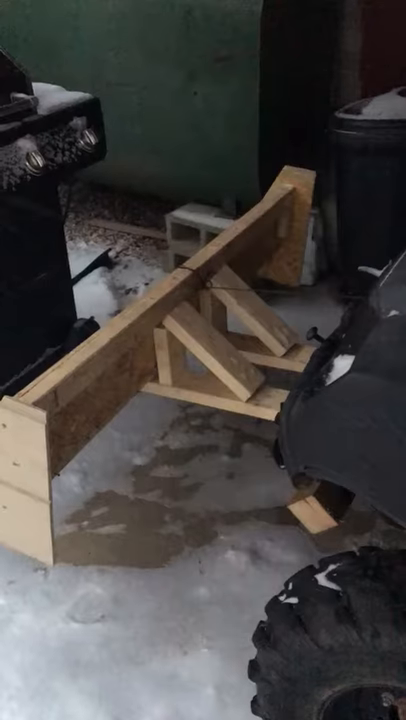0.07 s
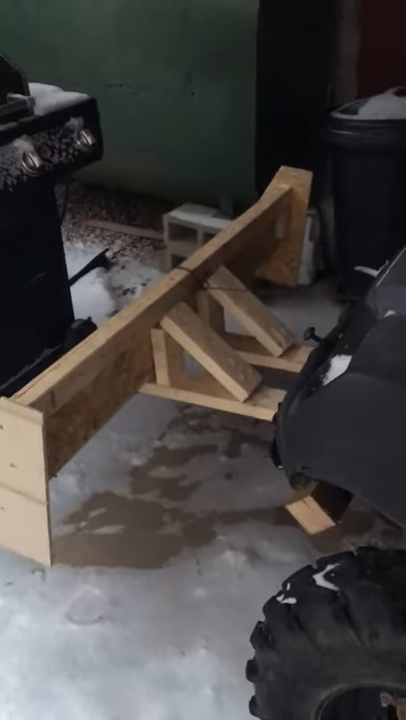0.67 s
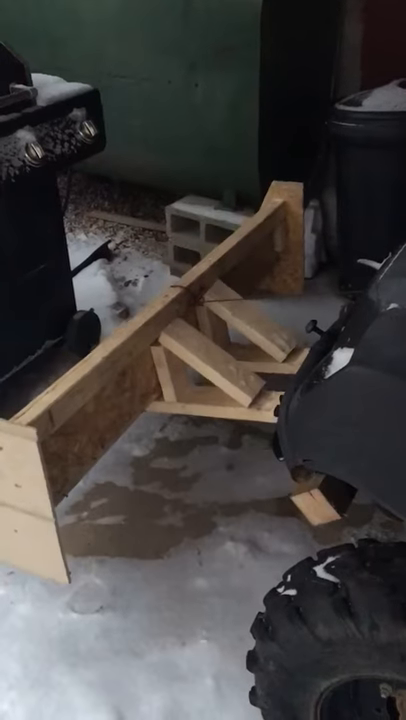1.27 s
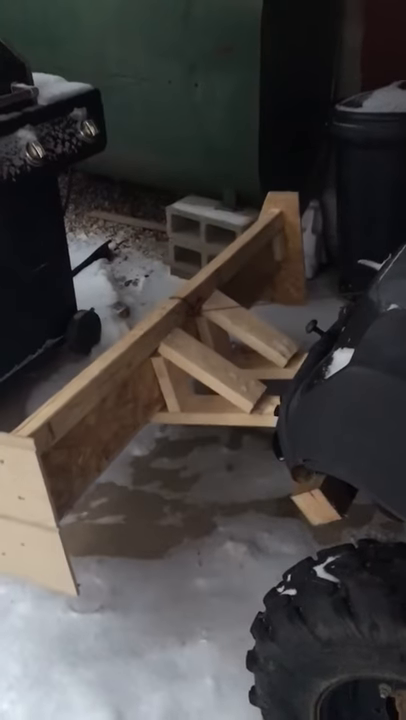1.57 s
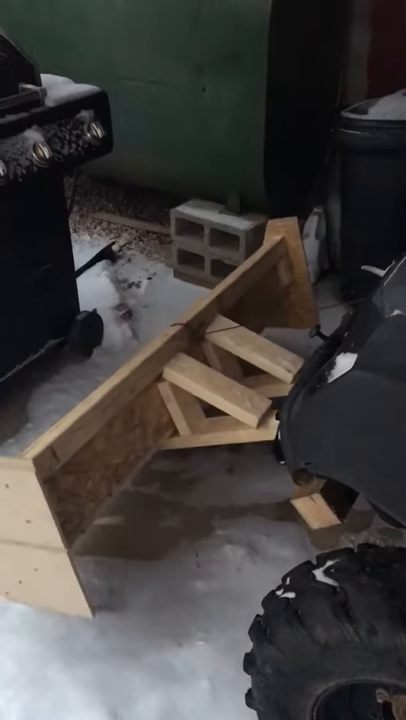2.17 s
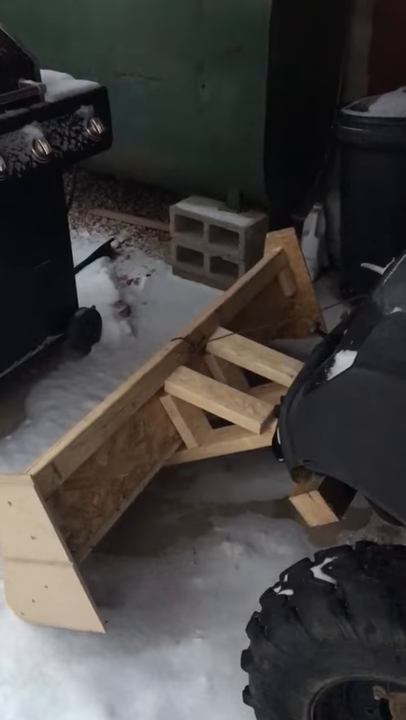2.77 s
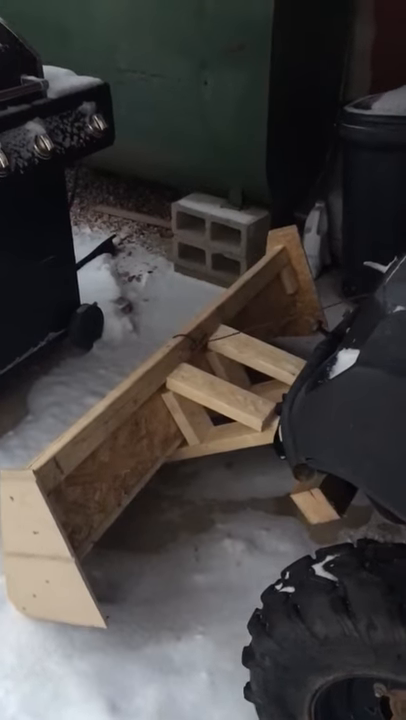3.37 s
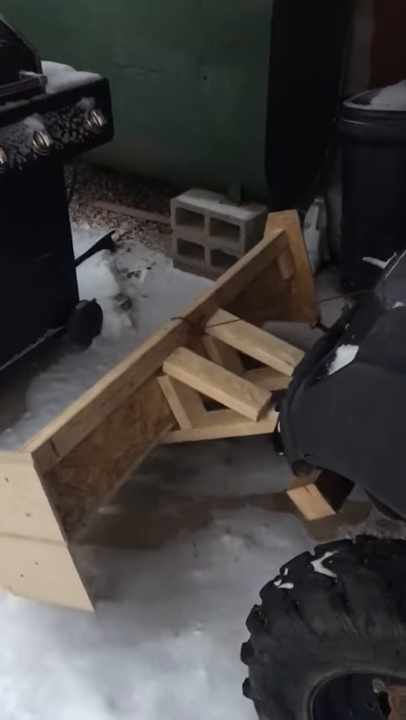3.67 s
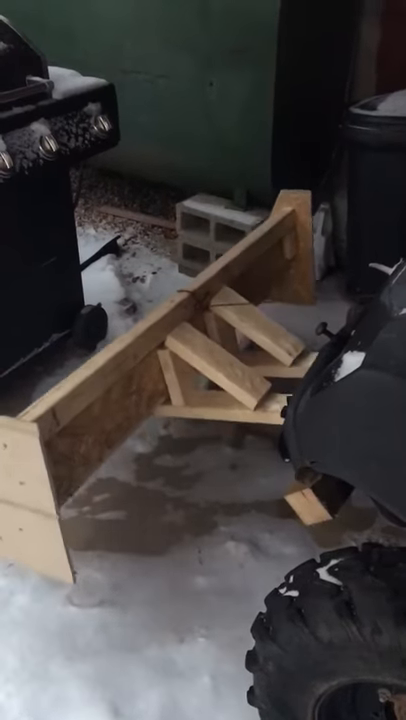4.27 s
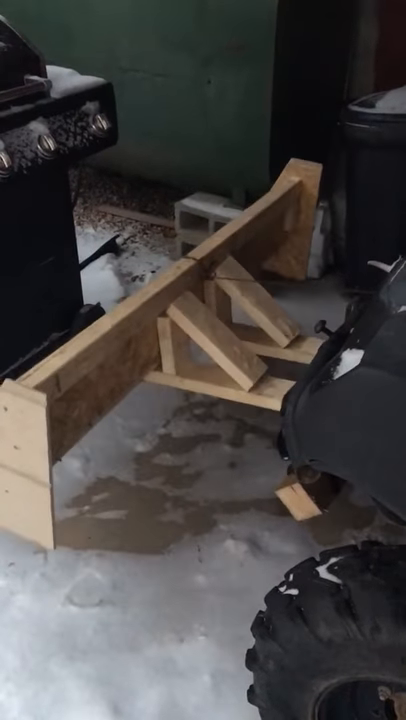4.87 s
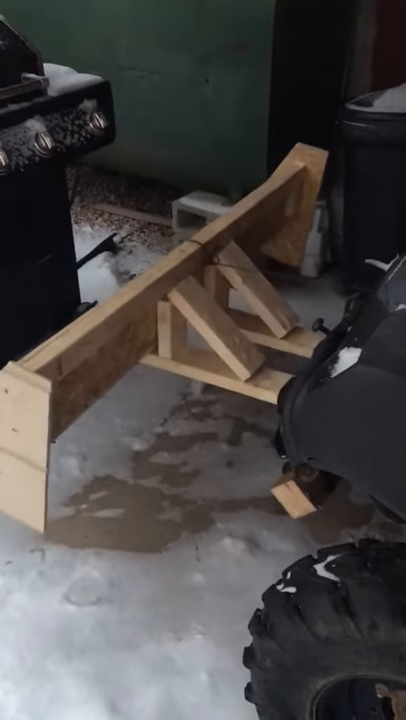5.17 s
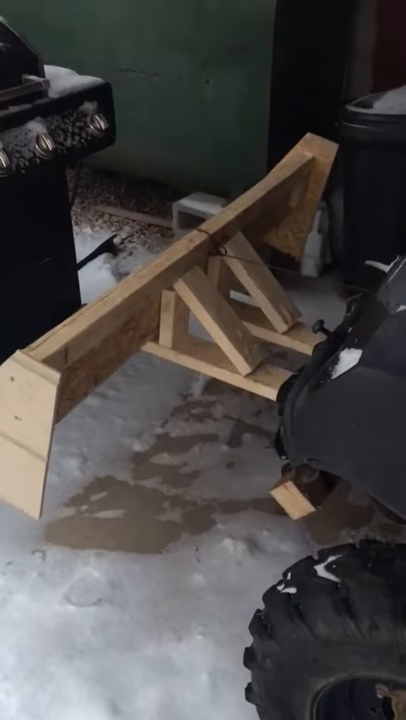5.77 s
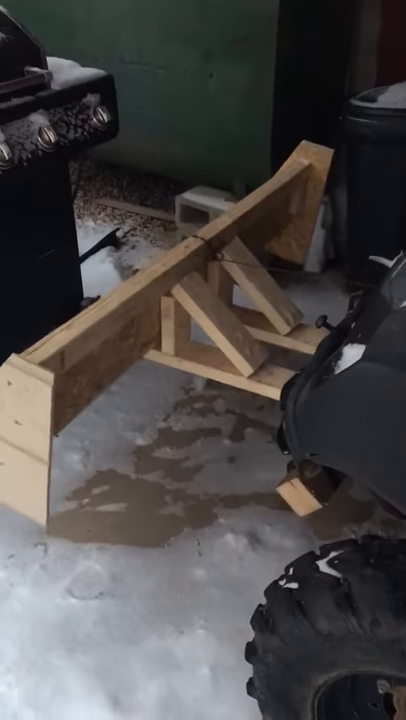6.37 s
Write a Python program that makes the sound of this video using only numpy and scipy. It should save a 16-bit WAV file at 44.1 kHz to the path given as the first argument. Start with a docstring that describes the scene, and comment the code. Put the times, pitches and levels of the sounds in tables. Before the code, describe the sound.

Light wind brushes the microphone outdoors, with a very faint, distant gliding whistle in the first half second. At 0.7 seconds a relay ticks, the drive clacks and an electric winch starts a loud, steady, grinding whine. The wooden plow blade knocks dully twice around 0.9, and the cable scuffs at 1.3. The motor stops at 2.9 with a clack and a faint steel ring. At 3.3 another tick and clack start the lift, louder and higher, racing briefly before settling. The cable scuffs near 5.1, then the pitch sags under load, and the winch stops at 5.5 with a clack, a wooden knock and a lingering ring from the steel frame. At 6.1 a click and clack start one short, lower run, lasting until about 6.4, as a wind gust rumbles on the microphone. Surrounding walls add a faint echo.

```python
"""Light wind on the microphone and a faint far whistle, then a relay tick, a clack and a whining winch.
The electric winch, on a quad, lowers a wooden plow blade, lifts it and briefly lowers it again.
Meshing teeth give tones at multiples of the shaft rate; their friction drives the housing's resonances.
The cable scuffs, the blade knocks and bobs, and the steel frame rings after the first two stops.
Surrounding walls return a faint echo."""
import sys
import numpy as np
from scipy import signal
from scipy.fft import rfft, irfft, next_fast_len
from scipy.io import wavfile
from scipy.ndimage import map_coordinates

SR = 44100
rng = np.random.default_rng(int(sys.argv[2]) if len(sys.argv) > 2 else 0)


def generate_wav(sig):
    """Save sig (samples, or channels by samples) to the path in sys.argv[1] as 16-bit PCM at SR."""
    pcm = np.round(np.clip(np.atleast_2d(sig).T, -1, 1) * 32767).astype(np.int16)
    wavfile.write(sys.argv[1], SR, pcm)


N = 283563
T = np.arange(N) / SR

# winch runs: start/s, stop/s, lifting, run-up/s, grinding/dB, whine/dB, hum/dB, brush hiss/dB
WINCH_RUNS = [(0.759, 2.895, False, 0.15, -28, -28, -29, -43.5),
              (3.309, 5.559, True, 0.27, -25, -23, -21.2, -39),
              (6.09, 6.43, False, 0.12, -27.5, -28.5, -34.5, -44.5)]
# tooth rate, one curve a run; the lift races until the cable is taut and labours near the top: t/s, f/Hz
MESH_RATES = [
    [(0.78, 271.6), (0.95, 311.1), (1.4, 311), (1.9, 305.4), (2.9, 303.7)],
    [(3.33, 294.5), (3.46, 402.3), (3.54, 403.5), (3.66, 362.5), (3.87, 350.6), (4.3, 345.8), (4.53, 352.4),
     (5.05, 350.7), (5.35, 344.9), (5.66, 308.5)],
    [(6.11, 266.6), (6.2, 288.8), (6.43, 308.8)],
]
# blade position: t/s, height (0 on the ground, 1 fully raised)
BLADE_HEIGHT = [(0.78, 0.7), (2.73, 0), (3.44, 0.0056), (5.55, 0.68), (6.11, 0.8), (6.43, 0.75)]
# gear tones: multiples of the shaft rate
SHAFT_ORDERS = [13, 14, 15, 16, 17, 18, 20, 30, 31, 32, 33, 34, 48, 57, 63, 64, 65, 79, 80, 82, 96, 111,
                112, 127, 128, 144, 160]
# strength of each gear tone, lowering and lifting: level/dB
ORDER_LEVELS_DOWN = [-21, -9.5, -7, -0.5, -12, -23, -16.5, -18, -35, -10.5, -12, -12.5, -11.5, -38, -23,
                     -12.5, -7, -17, -15.5, -11.5, -15, -19.5, -20.5, -15, -18, -22, -20]
ORDER_LEVELS_UP = [-22.5, -9, -10.5, -16.5, -12, -21, -48, -11, -14.5, -8, -18, -53, -13, -14.5, -13, -12.5,
                   -18, -15, -12, -20.5, -17.5, -18.5, -18.5, -19, -21, -19.5, -34]
# change from ground to top as the tooth load shifts: mesh harmonic, gain lowering/dB, gain lifting/dB
LOAD_GAINS = [(1, 11, -7.5), (2, -3, -8.5), (3, -10.5, -5), (4, 1.5, -2), (5, 16, 16), (6, 2, 10),
              (7, 2, -3), (9, 21, 9)]
# gear housing resonances: f/Hz, width/Hz, gain/dB
HOUSING_MODES = [(670, 65, 3.5), (1290, 55, 5), (1401, 35, 2.5), (1590, 60, 2), (1738, 35, 3.8),
                 (2420, 45, 5.5), (2810, 45, 4.5), (3135, 55, 5.5), (4225, 55, 5.5), (6440, 150, 4.5)]
# the housing rings as the motor spins up for the lift: t/s, length/s, first f/Hz, last f/Hz, level/dB
SPIN_UP_RING = (3.362, 0.09, 650, 745, -28.5)
# the drive takes up or drops its load: t/s, level/dB, rattle/s, T60/s, tilt/(dB per octave)
DRIVE_CLACKS = [(0.7445, -19, 0.0085, 0.11, -2), (2.9006, -19, 0.0082, 0.15, -4),
                (3.28, -21, 0.013, 0.11, -2), (5.543, -27, 0.0063, 0.095, 2.5),
                (6.081, -22, 0.01, 0.096, -0.5)]
# relay and switch contacts: t/s, level/dB, T60/s, ring f/Hz, ring gain/dB
RELAY_TICKS = [(0.7132, -35, 0.011, 2200, 15), (3.201, -42, 0.01, 2480, 14), (3.2533, -24, 0.016, 2730, 26),
               (6.053, -48, 0.03, 3520, -2), (6.0617, -28, 0.011, 2190, 13)]
# the cable slips and the blade bobs on it: t/s, level/dB, rise/s, T60/s, tilt/(dB per octave)
CABLE_SCUFFS = [(0.718, -40.5, 0.014, 0.22, 0.5), (1.281, -39, .003, 0.11, 14),
                (1.308, -33.5, 0.0034, 0.17, 13), (2.631, -50, 0.0091, 0.38, 13),
                (3.161, -51, 0.0033, 0.17, -1.5), (3.261, -42, 0.0049, 0.87, 0), (4.03, -40, .01, 0.31, 9),
                (5.07, -31, 0.0045, 0.18, 4), (5.702, -44, 0.002, 0.16, 4), (5.769, -45, 0.013, 0.19, 3.5),
                (5.866, -45, 0.02, 0.19, 3), (5.937, -48.5, 0.011, 0.19, 0.5),
                (6.064, -39.5, .003, 0.22, -0.5)]
# knocks of the wooden blade: t/s, level/dB, T60/s
BLADE_KNOCKS = [(0.880, -21, 0.12), (0.91, -22, 0.12), (2.92, -36.5, 0.28), (3.159, -56, 0.089),
                (5.549, -25, 0.15), (6.086, -27, 0.056)]
# steel frame modes: f/Hz, T60/s, level after lowering/dB, level after lifting/dB
FRAME_MODES = [(302, 0.42, -55, -39), (316, 2.5, -58, -42.5), (346, 2.2, -59, -42.5), (1030, 1.3, -56, -52),
               (1430, 0.97, -51, -61), (1740, 1.8, -73, -65)]
# stops that excite the frame: t/s
FRAME_JOLTS = [2.905, 5.55]
# gusts: peak t/s, level/dB, length/s
WIND_GUSTS = [(0.217, -50.5, 0.12), (0.437, -44, 0.1), (0.773, -43, 0.037), (0.96, -51, 0.12),
              (2.865, -46, 0.19), (4.109, -46, 0.072), (4.329, -51, 0.17), (4.604, -40, 0.04),
              (4.76, -36, 0.05), (5.355, -40, 0.09), (5.63, -46, 0.072), (5.96, -43, 0.061),
              (6.15, -35, 0.06), (6.3, -28.5, 0.24)]
# distant whistle: t/s, f/Hz, level/dB
WHISTLE_CONTOUR = [(0.19, 3000, -88.5), (0.23, 2930, -72.5), (0.28, 2340, -78), (0.33, 2170, -72),
                   (0.40, 1950, -79.5), (0.46, 2150, -76), (0.53, 2220, -75), (0.57, 2200, -88)]
# spectral densities of the noises: f/Hz, relative level/dB
GRIND_DOWN_SPECTRUM = [(100, -24), (200, -8), (300, 6.5), (400, 0), (490, -6), (660, 0), (770, -5.5),
                       (880, -0.5), (1350, -3), (1900, -5), (2700, -10.5), (3300, -6), (4300, -12),
                       (5200, -28.5)]
GRIND_UP_SPECTRUM = [(100, -24), (200, -13.5), (300, -1.5), (400, -2), (510, -7.5), (670, 0.5), (780, -5),
                     (880, -1), (1350, -2.5), (1900, -4.5), (2700, -8), (3300, -7), (4300, -10.5),
                     (5200, -30.5)]
BRUSH_SPECTRUM = [(2500, -20), (4500, -4.5), (5200, 3), (6500, 1.5), (8500, -2), (9700, -5.5), (10400, -12),
                  (11300, -9), (13500, -16), (16000, -23.5)]
CLACK_SPECTRUM = [(70, -53), (160, -20.5), (250, 1), (480, -16), (800, -8), (1200, -2), (2300, -4),
                  (3400, -5.5), (5200, -4), (6600, -4.5), (8500, -9), (10400, -16), (12000, -18.5),
                  (16000, -25)]
SCUFF_SPECTRUM = [(200, 13.5), (900, 2), (2000, -3.5), (4000, -9), (7000, -12), (10000, -24), (16000, -36)]
KNOCK_SPECTRUM = [(80, -39.5), (150, 5), (210, 6.5), (290, 16.5), (450, 4), (900, -16)]
ECHO_SPECTRUM = [(100, 25.5), (1000, -2.5), (3500, -7.5), (7000, -6), (16000, -17)]
WIND_SPECTRUM = [(20, -39), (35, -5.5), (58, 1.5), (100, -3), (170, -7), (300, -17), (600, -50),
                 (1500, -49.5), (5000, -72)]
AIR_SPECTRUM = [(180, -22.5), (300, 2), (416, -4.5), (568, -7), (814, -12.5), (913, -12.5), (1370, -16.5),
                (15000, -37)]

TEETH = 16  # meshes per shaft turn
RIPPLE_DB = 2.1  # spectral ripple of many small modes


def winch(mesh_rate, start, stop, lifting, run_up, grind_db, whine_db, hum_db, hiss_db):
    """Periodic tooth contact gives tones and modulates the friction noise of gears and motor brushes."""
    t = np.arange(start, stop + .25, 1 / SR)
    height = np.interp(t, *np.transpose(BLADE_HEIGHT))
    slack = np.clip(1 - height / 0.019, 0, 1)  # a grounded blade lets the gears run light
    unseated = np.exp((start - t) / run_up)  # the tones emerge as the teeth seat
    tooth_hz = np.interp(t, *np.transpose(mesh_rate)) * (1 + .0025 * drift(t, 25))
    meshes = np.cumsum(tooth_hz) / SR
    turns = meshes / TEETH
    throb = evened(amp(.9 * np.sin(2 * np.pi * turns)))  # the load varies once a turn
    chatter = amp(0.41 * drift(t, 110))
    contact = throb * chatter * (2.4 + np.exp(-(meshes % 1) / 0.3))  # steady slide, a bite per tooth
    grit, sparks = contact * rng.standard_normal((2, N))[:, :len(t)]
    spectrum = GRIND_UP_SPECTRUM if lifting else GRIND_DOWN_SPECTRUM
    grinding = amp(grind_db) * colour(grit, spectrum, HOUSING_MODES, ripple_db=RIPPLE_DB)
    hiss = brush_hiss(t, sparks, hiss_db)
    hum_gain = evened(throb ** 2.5) * amp(hum_db - 9.5 * unseated)
    whine_gain = throb * amp(whine_db - 7 * unseated - 7 * slack)
    tones = gear_tones(t, turns, tooth_hz, height, lifting, hum_gain, whine_gain)
    return run_envelope(t, start, stop, run_up, slack) * (grinding + tones + hiss)


def gear_tones(t, turns, tooth_hz, height, lifting, hum_gain, whine_gain, flutter_hz=44.78):
    """Mesh harmonics with once-a-turn modulation sidebands; backlash smears the higher ones more."""
    out = np.zeros(len(t))
    harmonics, gains_down, gains_up = np.transpose(LOAD_GAINS)
    for order, db in zip(SHAFT_ORDERS, ORDER_LEVELS_UP if lifting else ORDER_LEVELS_DOWN):
        harmonic = order / TEETH
        smear = min(.12 + .07 * harmonic, .68)
        steady = np.sqrt(2 * (1 - smear ** 2))
        swell, slip = drift(t, flutter_hz), drift(t, flutter_hz)
        phase = 2 * np.pi * (order * turns + rng.random())
        tone = (steady + smear * swell) * np.cos(phase) + smear * slip * np.sin(phase)
        # a tone swells as it glides through a resonance of the housing
        housing_db = 0.94 * resonance_db(tooth_hz[::32] * harmonic, HOUSING_MODES)
        ring_db = np.interp(t, t[::32], housing_db - np.median(housing_db))
        load_db = np.interp(harmonic, harmonics, gains_up if lifting else gains_down) * (height - 0.4)
        gain = hum_gain if round(harmonic) == 1 else whine_gain
        out += amp(db + ring_db + load_db) * gain * tone
    return out


def brush_hiss(t, sparks, db):
    """Sliding contact of brushes on the commutator: sputtering noise, filtered by the housing."""
    sputter_db = 0.98 * drift(t, 34.45)
    return amp(db + sputter_db) * colour(sparks, BRUSH_SPECTRUM, HOUSING_MODES, ripple_db=RIPPLE_DB)


def run_envelope(t, start, stop, run_up, slack, soft_db=-3, surge_db=2.5, settle_s=0.074, coast_t60=0.17):
    """Level follows load: a soft start, a surge, a dip on slack cable, exponential decay on coasting."""
    db = np.interp(t - start, [0, run_up, run_up + settle_s], [soft_db, surge_db, 0])
    db += 0.31 * drift(t, 14) - 5 * slack  # the cable winds unevenly
    db -= 60 * np.maximum(t - stop, 0) / coast_t60
    return amp(db) * np.minimum((t - start) / 0.024, 1)


def housing_ring(s, length, from_hz, to_hz, db):
    """Resonance: the gear housing rings with a short, rough, rising tone as the motor spins up."""
    t = np.arange(0, length, 1 / SR)
    hz = np.interp(t, [0, length], [from_hz, to_hz]) * (1 + 0.02 * drift(t, 200))
    envelope = amp(db) * np.sqrt(abs(np.sin(np.pi * t / length)))
    return placed(s, envelope * np.sin(2 * np.pi * np.cumsum(hz) / SR))


def drive_clacks():
    """Impacts excite the housing's resonances as the drive takes up or drops its load."""
    return sum(placed(s, burst(CLACK_SPECTRUM, db, 0.0022, rattle, t60, HOUSING_MODES, tilt))
               for s, db, rattle, t60, tilt in DRIVE_CLACKS)


def relay_ticks():
    """Very brief contact gives a bright spectrum with one broad resonance."""
    return sum(placed(s, burst(SCUFF_SPECTRUM, db, 0.0009, 0.00031, t60, [(hz, 1100, gain)], tilt_db=7))
               for s, db, t60, hz, gain in RELAY_TICKS)


def cable_scuffs():
    """Friction of the slipping cable gives short bursts of noise."""
    return sum(placed(s, burst(SCUFF_SPECTRUM, db, rise, 0.0067, t60, tilt_db=tilt))
               for s, db, rise, t60, tilt in CABLE_SCUFFS)


def blade_knocks():
    """Impacts on the wooden blade give a dull, strongly damped response."""
    return sum(placed(s, burst(KNOCK_SPECTRUM, db, 0.0024, 0.0041, t60)) for s, db, t60 in BLADE_KNOCKS)


def frame_ring():
    """Free vibration: the steel frame's modes decay exponentially after a stop."""
    t = T[:SR]
    return sum(placed(s, amp(db - 60 * t / t60) * np.sin(2 * np.pi * hz * t))
               for hz, t60, *levels in FRAME_MODES for s, db in zip(FRAME_JOLTS, levels))


def wall_echo(x, wet_db=-23.5, t60=0.92):
    """Diffuse reflection from the walls: convolution with a dull, decaying noise."""
    t = T[:SR]
    envelope = amp(-60 * t / t60) * np.minimum(t / 0.0029, 1)
    tail = envelope * colour(rng.standard_normal(SR), ECHO_SPECTRUM)
    return amp(wet_db) * signal.fftconvolve(x, tail / np.linalg.norm(tail))[:N]


def wind(breeze_db=-55, lumps_db=5):
    """Turbulent pressure buffets the microphone; breeze and gusts add in power."""
    power = amp(breeze_db + lumps_db * drift(T, 14)) ** 2
    for s, db, length in WIND_GUSTS:
        power += amp(db) ** 2 * np.exp(-(2 * (T - s) / length) ** 2)
    return np.sqrt(power) * colour(rng.standard_normal(N), WIND_SPECTRUM)


def still_air(db=-63.5):
    """Stationary broadband noise forms the outdoor background."""
    return amp(db) * colour(rng.standard_normal(N), AIR_SPECTRUM)


def far_whistle(waver=0.022):
    """A faint gliding tone wavers by random frequency modulation."""
    s, hz, db = np.transpose(WHISTLE_CONTOUR)
    pitch = np.interp(T, s, hz) * (1 + waver * drift(T, 400))
    envelope = amp(np.interp(T, s, db)) * (T < s[-1])
    return envelope * np.sin(2 * np.pi * np.cumsum(pitch) / SR)


def burst(spectrum, db, rise, hold, t60, peaks=(), tilt_db=0):
    """Tiny impacts superpose into noise that swells and decays exponentially; times in s."""
    t = T[:SR // 2]
    grains = rng.standard_normal(len(t)) * amp(drift(t, 900))
    envelope = np.minimum(t / rise, 1) * amp(db - 60 * np.maximum(t - hold, 0) / t60)
    return envelope * colour(grains, spectrum, peaks, tilt_db, RIPPLE_DB)


def colour(x, spectrum, peaks=(), tilt_db=0, ripple_db=0):
    """Linear filtering: spectrum, tilt per octave, resonances and modal ripple add in dB; rms 1."""
    size = next_fast_len(len(x))
    hz = np.fft.rfftfreq(size, 1 / SR) + 1
    f, level = np.transpose(spectrum)
    in_band = np.clip(hz, f[0], f[-1])
    db = np.interp(np.log(hz), np.log(f), level) + tilt_db * np.log2(in_band)
    db -= 20 * abs(np.log2(hz / in_band))  # roll-off beyond the band
    db += resonance_db(hz, peaks)
    db += ripple_db * np.minimum(hz / 4000, 1) * drift(hz, 1 / 70)
    return evened(irfft(rfft(x, size) * amp(db), size)[:len(x)])


def resonance_db(hz, peaks):
    """Each resonance adds a Lorentzian hump to the level."""
    return sum(gain / (1 + (2 * (hz - centre) / width) ** 2) for centre, width, gain in peaks)


def drift(t, rate):
    """Smooth random fluctuation of rms 1, changing about rate times per unit of t."""
    knots = rng.standard_normal(4096)
    coarse = t[::32]
    curve = map_coordinates(knots, [coarse * rate], order=3, mode="wrap")
    return evened(np.interp(t, coarse, curve))


def amp(db):
    """Level to amplitude ratio."""
    return 10 ** (np.asarray(db) / 20)


def evened(x):
    """Normalisation to rms 1."""
    return x / np.sqrt(np.mean(abs(x) ** 2) + 1e-20)


def placed(s, sound):
    """A sound delayed by s seconds, in N samples."""
    return np.pad(sound, (round(s * SR), N))[:N]


def scene():
    """Superposition of the machine, its echo and the outdoor background."""
    machine = drive_clacks() + relay_ticks() + cable_scuffs() + blade_knocks() + frame_ring()
    machine += housing_ring(*SPIN_UP_RING)
    for mesh_rate, (start, *settings) in zip(MESH_RATES, WINCH_RUNS):
        machine += placed(start, winch(mesh_rate, start, *settings))
    return (machine + wall_echo(machine) + still_air() + far_whistle() + wind())[None]


def record(dry, open_s=0.112, edge_hz=15900):
    """Gating and band limiting: the microphone opens after a moment, and a low-pass cuts the top."""
    opened = dry * np.clip((T - open_s) / 0.0056, .02, 1)
    low_pass = signal.firwin(511, edge_hz, window=("kaiser", 9), fs=SR)
    return signal.oaconvolve(opened, low_pass[None], "same")


dry = scene()
out = record(dry)
generate_wav(out)
```